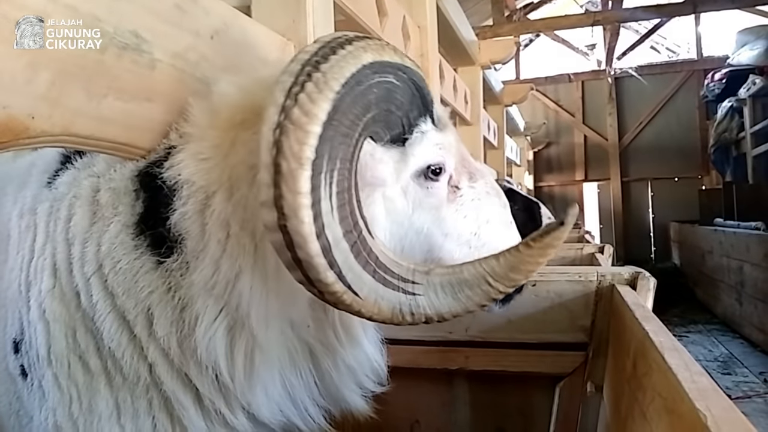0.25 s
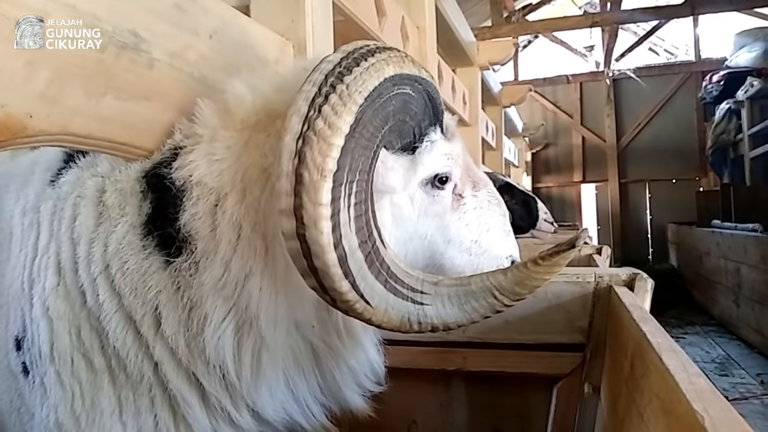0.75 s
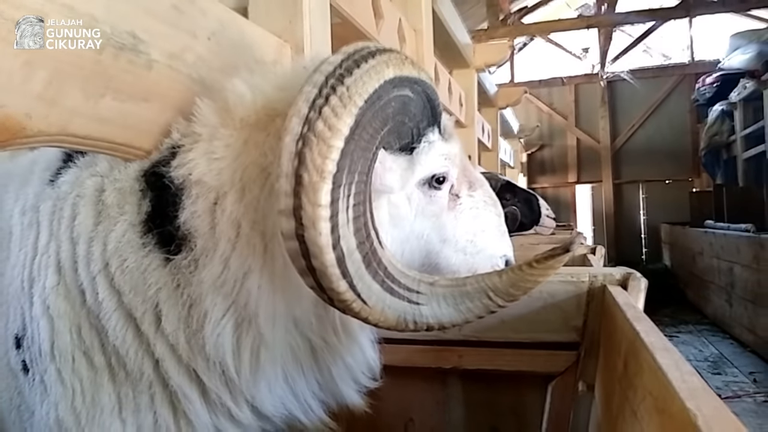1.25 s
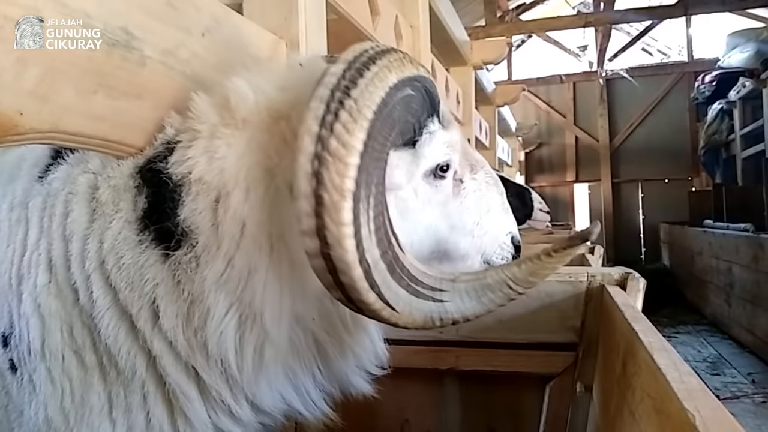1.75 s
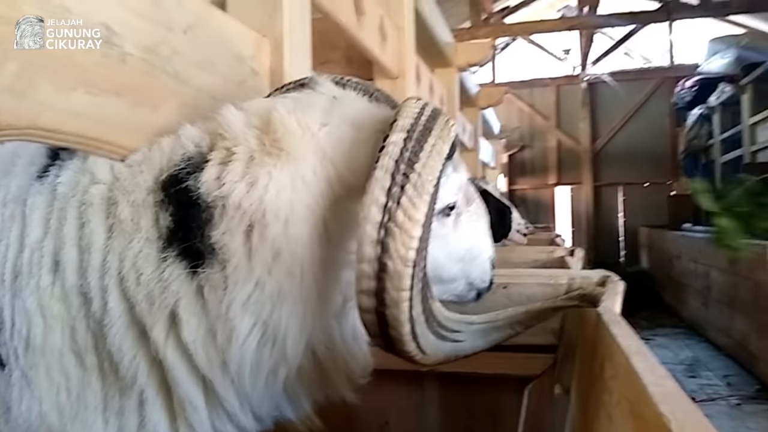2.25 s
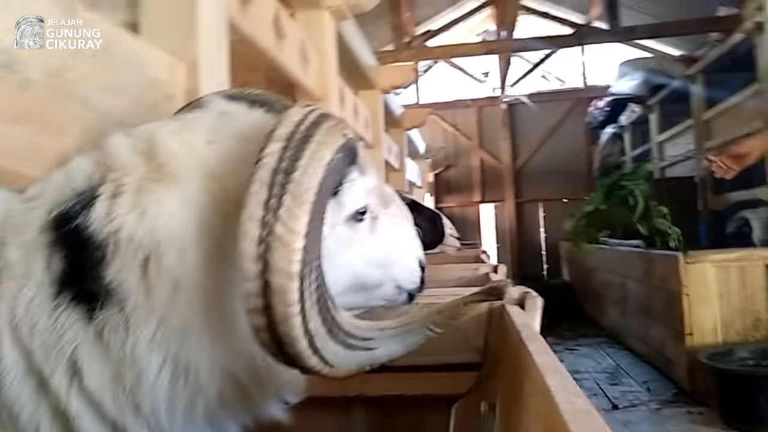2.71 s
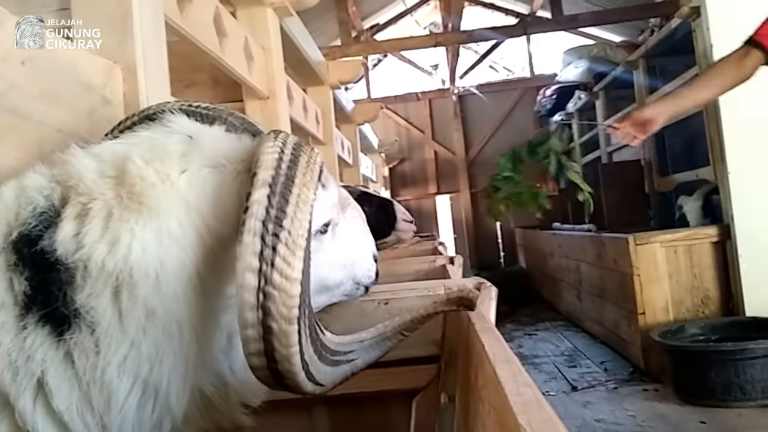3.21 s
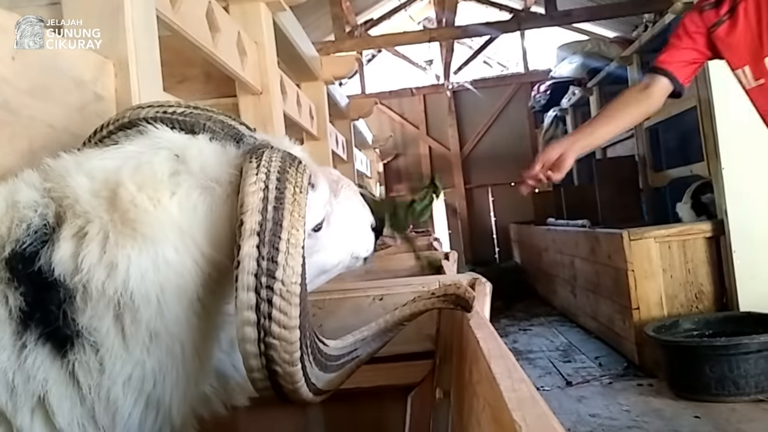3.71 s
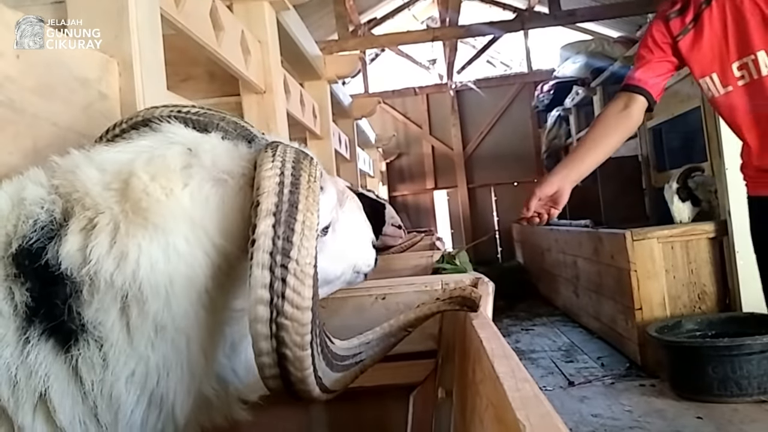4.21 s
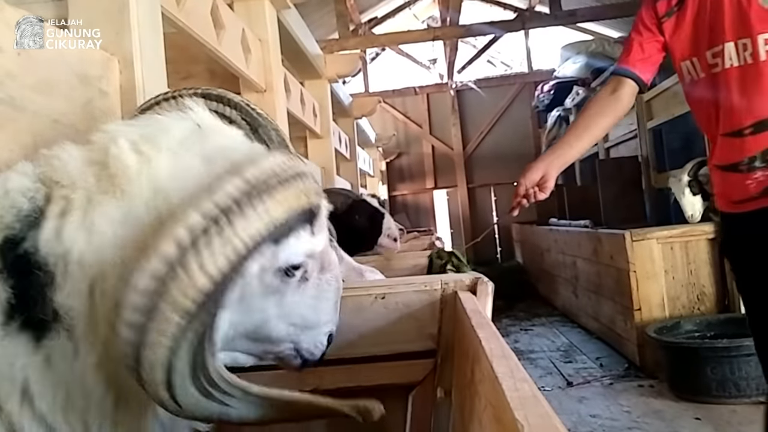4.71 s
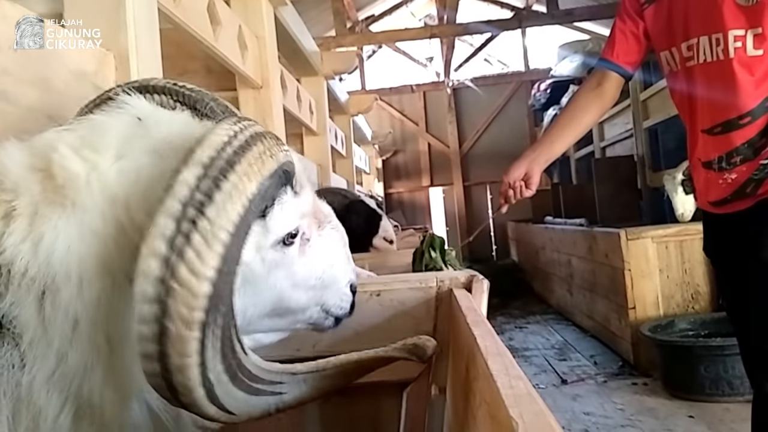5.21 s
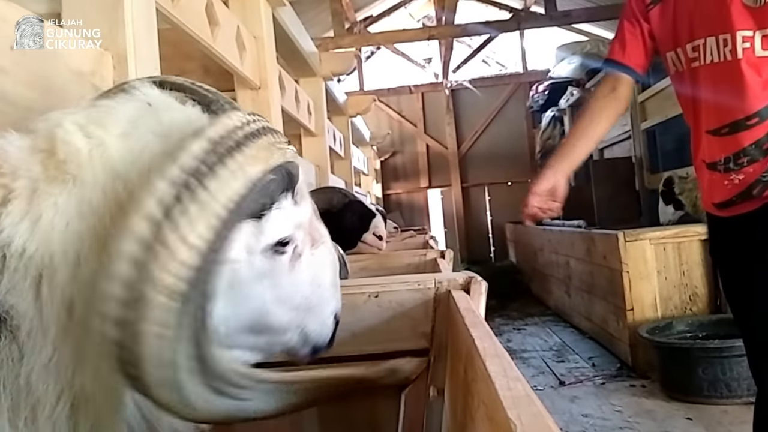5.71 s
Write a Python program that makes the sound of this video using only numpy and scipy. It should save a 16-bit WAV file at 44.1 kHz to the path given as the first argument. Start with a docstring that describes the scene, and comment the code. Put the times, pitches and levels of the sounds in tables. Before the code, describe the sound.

A sheep bleats hoarsely close by in a wooden barn while heavy low thumps, rumble and scuffs of a hand-held microphone dominate, ending near a sharp pop.

```python
"""Inside a wooden barn: shaped-noise air and hiss, thin sine whines up to 2.95 s, and the rumble of a hand-held microphone.
Soft bumps rock the housing as short sinking sines; at 1.3 s a double tick of ringing modes leads into a near sheep.
Its bleat, fold pulses ringing throat resonances, is hoarse at both ends and clear in the middle.
From 2 s fingers scuff the housing in noise bursts with hollow knocks; at 3.4 s a far sheep answers faintly.
One sharp pop, a shaped click, hits the microphone at 5.7 s."""
import sys
import numpy as np
from scipy import signal
from scipy.fft import rfft, irfft
from scipy.io import wavfile
from scipy.ndimage import uniform_filter1d

SR = 44100
rng = np.random.default_rng(int(sys.argv[2]) if len(sys.argv) > 2 else 0)


def inscribe(sig):
    """Save sig as 16-bit PCM at rate SR to the path in sys.argv[1].

    A 1-D sig is mono; a 2-D sig holds one channel per row.
    Samples are clipped to [-1, 1] before scaling.
    """
    pcm = np.round(np.clip(np.atleast_2d(sig).T, -1, 1) * 32767)
    wavfile.write(sys.argv[1], SR, pcm.astype(np.int16))


N = 262395
TIME = np.arange(N) / SR

# soft bumps on the housing: t/s of the swell's peak, peak level/dB, f/Hz that the pitch sinks to
THUMPS = [(0.557, -17.5, 59.6), (.61, -22, 63.4), (.67, -23.5, 56), (2.078, -9.5, 59.4),
          (2.135, -9.5, 56.3), (2.188, -18, 62.2), (2.857, -14.5, 60), (2.9, -16.5, 48.4),
          (3.156, -17, 58.6), (3.229, -1, 77.5), (3.312, -13, 75.5), (3.535, -18.5, 54.8),
          (3.586, -7, 55.2), (3.631, -0.5, 78.2), (3.678, -10, 72), (3.892, -17, 56.5),
          (4.289, -16.5, 51.55), (4.355, -19, 61.9), (4.45, -13, 104), (4.48, -8.5, 72.7),
          (4.503, -13.5, 65.7), (4.526, -8.5, 75), (4.592, -20.5, 58.7), (4.83, -20, 63),
          (5.109, -12.5, 71.5), (5.155, -4, 76.3), (5.211, -3, 75), (5.256, -11, 80), (5.293, -15, 68.6),
          (5.328, -12.5, 60.3), (5.454, -9, 55.7), (5.512, -18, 65), (5.93, -17, 57.7)]
# scuffs of the grip: t/s of the peak, level/dB, rise/s, decay/s, brightness/(dB per octave, 230-1300 Hz)
SCUFFS = [(2.058, -40.5, .022, 0.032, -3), (2.298, -38, 0.0044, 0.01, -2.5), (2.46, -43, 0.005, 0.011, -2),
          (2.843, -48.5, .012, .015, -2), (3.03, -50, 0.0068, .014, -13.5), (3.11, -44, 0.016, .02, -14),
          (3.2, -47, .008, .006, -4), (3.222, -25.5, .004, 0.0075, -8), (3.304, -41, .003, 0.0082, -7),
          (3.547, -36.5, .004, 0.059, -1), (3.608, -38.5, 0.011, .012, -1.5),
          (3.626, -31, 0.0049, 0.015, -2.5), (3.673, -33, 0.0051, 0.0091, -4.5),
          (4.345, -44.5, 0.02, .06, -20), (4.429, -32.5, .022, 0.034, -.5), (4.438, -26, .006, 0.017, -16),
          (4.834, -41.5, 0.0041, 0.0085, -8), (5.138, -21.5, .019, 0.02, -4.5),
          (5.18, -27, 0.0078, 0.026, -6), (5.248, -43.5, 0.017, 0.046, 5.5), (5.394, -50, 0.034, 0.01, 8),
          (5.417, -35, 0.025, 0.042, -5.5), (5.85, -47, 0.045, 0.044, 2.5)]


def amp(db):
    """Decibels to gain."""
    return 10 ** (np.asarray(db) / 20)


def unit(x):
    """Scales to rms 1."""
    return x / np.sqrt(np.mean(x ** 2) + 1e-20)


def read(points, hz):
    """Reads a spectrum table on a log-frequency axis."""
    f, value = np.transpose(points)
    return np.interp(np.log(hz + 1), np.log(f + 1), value)


def follow(rows, t):
    """Reads every column of a curve table at the times t."""
    s, *columns = np.transpose(rows)
    return [np.interp(t, s, c) for c in columns]


def add(mix, s, sound):
    """Mixes a sound in at time s."""
    part = mix[max(round(s * SR), 0):][:len(sound)]
    part += sound[:len(part)]


def noise(colour):
    """Noise of rms 1 with the given spectrum."""
    spectrum = rfft(rng.standard_normal(N))
    return unit(irfft(spectrum * amp(read(colour, np.fft.rfftfreq(N, 1 / SR))), N))


def wander(rate_hz, t=TIME):
    """A random drift of rms 1 over the times t, with two straight segments per cycle of the rate."""
    knots = rng.standard_normal(4096)
    return unit(np.interp((t - t[0]) * 2 * rate_hz, np.arange(len(knots)), knots))


def resonate(x, hz, width):
    """A steep resonance that follows the curve hz: shift down to zero, smooth twice, shift back."""
    turn = np.exp(2j * np.pi * np.cumsum(hz * np.ones(len(x))) / SR)
    r = np.exp(-np.pi * width / SR)
    smooth = signal.lfilter([(1 - r) ** 2], [1, -2 * r, r * r], x / turn + 1e-18)
    return 2 * (turn * smooth).real


def background():
    """Quiet barn air and hiss with faint drones: shaped noise and noise-fed resonances; sine whines switch off."""
    # air spectrum: f/Hz, relative level/dB per Hz
    air_colour = [(150, -21.5), (250, -4.5), (375, -4), (437, -4.5), (655, -9), (1020, -9), (1550, -14.5),
                  (1690, -17.5), (2030, -13.5), (2250, -17), (3050, -16.5), (4730, -20), (14200, -25.5)]
    # faint droning resonances in the air: f/Hz, width/Hz, rms level/dB
    drones = [(1040, 230, -75), (1540, 85, -71.5)]
    # electrical whine: f/Hz, rms level/dB
    whines = [(1000, -70), (2000, -72), (3000, -76), (4000, -82), (13000, -77.5), (14000, -79.5)]
    whine_ends_s, fade_s = 2.95, 0.026
    whine = sum(amp(db) * np.sqrt(2) * np.sin(2 * np.pi * hz * TIME) for hz, db in whines)
    air = amp(-58.5 + 0.63 * wander(7.2)) * noise(air_colour)
    drone = sum(amp(db) * unit(resonate(rng.standard_normal(N), hz, width)) for hz, width, db in drones)
    return air + drone + whine * np.clip((whine_ends_s - TIME) / fade_s, 0, 1)


def rumble(rub_db=-19, rub_growth=1.237, onset_s=0.038):
    """The moving hand shakes the housing without pause, more around each bump, and rubs it more as unrest grows."""
    # slow unrest of the hand: t/s, level/dB before the hand gain
    hand = [(0.0, -44), (0.48, -42.5), (0.6, -41), (0.72, -38), (0.82, -41), (1.09, -44.5), (1.52, -37),
            (1.87, -45.5), (2.29, -37), (2.55, -37), (3.08, -27), (3.33, -32.5), (3.69, -31), (4.06, -32),
            (4.25, -36.5), (4.51, -24.5), (4.92, -41.5), (5.09, -32.5), (5.32, -27), (5.45, -32.5),
            (5.95, -29)]
    # spectrum of the shaking: f/Hz, relative level/dB per Hz
    shake_colour = [(12, -34.5), (20, -18), (42, 1), (65, 1), (116, -11.5), (184, -30.5), (300, -42),
                    (400, -52), (520, -75.5), (880, -120)]
    # skin on the housing: f/Hz, relative level/dB per Hz
    rub_colour = [(60, -43.5), (130, 2), (175, -1.5), (240, -10.5), (400, -24.5), (900, -62.5)]
    hand_gain_db, bass_cut_hz = 4.5, 35.4
    # shake around a 0 dB bump, how far it follows the bump's dB, its decay
    aftershake_db, aftershake_share, aftershake_s = -24, 0.27, 0.076
    power = amp(follow(hand, TIME)[0] + hand_gain_db) ** 2
    for s, db, _ in THUMPS:
        dying = np.exp(-np.maximum((s - TIME) / onset_s, (TIME - s) / aftershake_s).clip(max=20))
        power = power + (amp(aftershake_db + aftershake_share * db) * dying) ** 2
    unrest_db = 10 * np.log10(power)
    shake = noise(shake_colour)
    # level the shake's own swings so that the unrest alone sets its loudness
    shake = shake / np.sqrt(uniform_filter1d(uniform_filter1d(shake ** 2, size=3000), size=3000))
    rub = amp(rub_db + rub_growth * unrest_db + 2 * wander(25)) * noise(rub_colour)
    # the microphone passes little of the deepest rumble
    bass_cut = signal.butter(6, bass_cut_hz, "high", fs=SR, output="sos")
    return signal.sosfilt(bass_cut, amp(unrest_db) * shake + rub)


def thumps(glide=0.93, settle=0.0052, swell=2.3):
    """Each bump swells, more slowly when soft, and rocks a few times, sinking in pitch."""
    # a 0 dB bump peaks within this many cycles; softer ones take longer
    swell_cycles, soft_slowing = 0.788, 0.3533
    t, out = np.arange(SR // 4) / SR, np.zeros(N)
    for s, db, hz in THUMPS:
        rise = swell_cycles / hz * amp(-soft_slowing * db)
        turns = hz * (t + glide * settle * (1 - np.exp(-t / settle)))
        push = (t / rise * np.exp(1 - t / rise)) ** swell
        add(out, s - rise, amp(db) * push * np.sin(2 * np.pi * turns))
    return out


def barn(x):
    """Sparse reflections from boards and roof, the treble dying first."""
    # reverberation of the barn: f/Hz, t60/s
    decay_times = [(200, 0.6), (850, 0.28), (2000, 0.24), (10000, 0.15)]
    struck = rng.random(SR) < 2500 / SR  # about 2500 reflections a second
    taps = rng.standard_normal(SR) * struck * (np.arange(SR) > .006 * SR)
    hz, t, z = signal.stft(taps, SR, nperseg=256)
    fading = amp(-60 * t / read(decay_times, hz)[:, None])
    tail = signal.istft(z * fading, SR, nperseg=256)[1]
    return signal.fftconvolve(x, tail / np.linalg.norm(tail))[:N]


def ticks():
    """Something small and hard taps twice in the pen, its modes ringing briefly."""
    # taps: t/s of the onset, direct peak level/dB
    taps = [(1.323, -43), (1.333, -30.5)]
    # ringing modes: f/Hz, relative level/dB, t60/s
    modes = [(2190, -5, 0.012), (2920, -1.5, 0.012), (3570, 2.5, 0.012), (4350, -14, 0.015),
             (6300, -17, 0.012)]
    t, out = np.arange(SR // 8) / SR, np.zeros(N)
    ring = sum(amp(db - 60 * t / t60) * np.sin(2 * np.pi * hz * t) for hz, db, t60 in modes)
    ring = ring * (1 - np.exp(-t / 0.00037))
    for s, db in taps:
        add(out, s, amp(db) * ring / abs(ring).max())
    return out + amp(-28) * barn(out)


def gesture(pitch, *curves):
    """The controls of one call over time: pitch, level, roughness, mouth opening and brightness."""
    t = np.arange(pitch[0][0], pitch[-1][0], 1 / SR)
    return t, *(follow(curve, t)[0] for curve in (pitch, *curves))


def bleat(controls, throat, jitter, quaver, rasp, doubling, flutter_db, wobble, low_hz, nose_db):
    """Pulses of the vocal folds, uneven, alternately strong and weak, and noisy when hoarse, ring the throat."""
    (t, hz, level_db, rough, mouth, bright_db), out = controls, np.zeros(N)
    unsteady = jitter * wander(70, t) + quaver * wander(9.04, t)
    turns = np.cumsum(hz * (1 + rough * unsteady)) / SR
    folds = unit(sum(np.cos(2 * np.pi * k * turns) for k in np.arange(1, 31)))
    folds = folds * (1 + doubling * rough * np.cos(np.pi * turns))
    # air escapes in a puff at each opening of the folds
    puffs = unit(np.exp(-(turns % 1) / 0.89) * rng.standard_normal(N)[:len(t)])
    drive = (1 - rough) * folds + rasp * rough * puffs
    voice = 0
    for k, (f, width, db) in enumerate(throat):
        # the mouth moves the three lowest resonances; a hoarse throat makes each one tremble on its own
        centre = f * (mouth if k < 3 else 1) * (1 + wobble * rough * wander(25, t))
        tilt_db = bright_db * np.log2(min(f, 2300) / 800)
        gain = amp(db + tilt_db + flutter_db * rough * wander(30.1, t))
        voice = voice + gain * resonate(drive, centre, width)
    # the mouth radiates little below its first resonance; a weak husk comes through the nose
    voice = signal.sosfilt(signal.butter(6, low_hz, "high", fs=SR, output="sos"), voice)
    voice = voice + amp(nose_db) * resonate(drive + puffs, 483, 530)
    # level the voice so that the effort curve alone sets its loudness
    voice = voice / np.sqrt(abs(uniform_filter1d(voice ** 2, size=1400)) + 1e-9)
    effort = amp(level_db + flutter_db * rough * wander(44.1, t))
    add(out, t[0], voice * effort * signal.windows.tukey(len(t), .03))
    return out


def chest(controls, jitter=0.01):
    """The lowest harmonics hum through chest and nose, clean even where the throat is hoarse, and grow with time."""
    # first four harmonics of the hum: rms level/dB at mid-call, before the mix
    harmonics_db = [-54.5, -61.5, -62.5, -59.5]
    growth_db_per_s, fade_s = 7.5, 0.059
    (t, hz, *_), out = controls, np.zeros(N)
    turns = np.cumsum(hz * (1 + jitter * wander(30.4, t))) / SR
    hum = sum(amp(db) * np.sqrt(2) * np.sin(2 * np.pi * (k + 1) * turns) for k, db in enumerate(harmonics_db))
    held = np.clip(np.minimum(t - t[0], t[-1] - t) / fade_s, 0, 1)
    add(out, t[0], hum * held * amp(growth_db_per_s * (t - t.mean())))
    return out


def mouth_rasp(controls):
    """Air hisses out of the open mouth in time with the folds, more when the voice is hoarse."""
    # air over tongue and teeth: f/Hz, relative level/dB per Hz
    rasp_colour = [(1200, -34), (2500, -14), (2950, 0), (3300, -1), (3700, -4), (4400, -13), (7000, -19),
                   (12000, -36)]
    rasp_db, rasp_share = -41, 0.49  # level at 0 dB effort, and how far it follows the effort's dB
    (t, hz, level_db, rough, *_), out = controls, np.zeros(N)
    phase = np.cumsum(hz) / SR % 1
    puffs = unit(np.exp(-2 * phase) * noise(rasp_colour)[:len(t)])
    loudness = np.sqrt(rough) * amp(rasp_db + rasp_share * level_db)
    add(out, t[0], puffs * loudness * signal.windows.tukey(len(t), .1))
    return out


def sheep(nose_db=-25.5, far_nose_db=-25):
    """The near animal's fold-driven call and the far one's answer, heard more through the barn than direct."""
    # throat resonances of each animal: f/Hz, width/Hz, relative level/dB
    near_throat, far_throat = [(801.4, 147, -4.5), (885.5, 137, -9.5), (1040, 80, -14), (1380, 130, -24),
                               (1656, 162, -15.5), (2320, 185, -22.5), (2930, 420, -34.5),
                               (3730, 1100, -49.5)], [(517, 200, 3), (775, 160, 2.5), (1060, 300, 3),
                                               (1360, 250, -12)]
    # pitch of each bleat: t/s, f/Hz
    near_pitch, far_pitch = [(1.325, 148.8), (1.372, 150.6), (1.396, 158.9), (1.456, 157.4), (1.478, 166.6),
                             (1.536, 164.7), (1.562, 158.9), (1.774, 152.7), (1.864, 146.6), (1.885, 143.5),
                             (1.94, 142.4), (1.97, 137.8), (2.03, 134.5)], [(3.41, 268), (3.45, 260), (3.51, 242.7), (3.56, 266.5),
                                                 (3.73, 267.1), (3.82, 262.1), (3.9, 256.4), (3.97, 256.1),
                                                 (4.13, 263.3), (4.4, 249.6)]
    # effort of each bleat, the near one in uneven pushes: t/s, level/dB before the mix
    near_level, far_level = [(1.325, -53), (1.342, -42), (1.362, -46.5), (1.402, -32.5), (1.435, -39),
                             (1.462, -38), (1.485, -34.5), (1.54, -37), (1.606, -35), (1.645, -34),
                             (1.775, -32.5), (1.815, -36.5), (1.864, -38), (1.915, -39.5), (1.948, -44),
                             (1.97, -38.5), (2.0, -49.5), (2.03, -55)], [(3.409, -58), (3.452, -51.5), (3.51, -66), (3.56, -57),
                                                 (3.68, -58), (3.79, -51.5), (3.9, -53), (3.97, -57.5),
                                                 (4.15, -60), (4.27, -59.5), (4.4, -63)]
    # hoarseness: t/s, roughness/(0-1)
    near_rough, far_rough = [(1.33, .7), (1.37, .5), (1.4, .27), (1.445, .55), (1.485, .22), (1.53, .33),
                             (1.572, .06), (1.81, .05), (1.84, .1), (1.875, .35), (1.92, .16), (1.97, .55),
                             (2.03, .9)], [(3.41, .18), (3.52, .3), (3.62, .22), (3.76, .12),
                                                 (3.84, .17), (3.91, .2), (4, .7), (4.4, .8)]
    # mouth opening: t/s, factor on the three lowest throat resonances
    near_mouth, far_mouth = [(1.33, 0.92), (1.46, 0.98), (1.57, 0.98), (1.61, 1.09), (1.66, 1.01),
                             (1.78, 1.007), (1.83, 1.057), (1.92, 1.035), (2.0, 0.99)], [(3.41, 1.01), (3.88, 0.89), (4.4, 0.94)]
    # brightness: t/s, tilt/(dB per octave on the throat resonances)
    near_bright, far_bright = [(1.35, 1.5), (1.41, -3.5), (1.5, 0), (1.62, 2), (1.7, -1.5), (1.785, -4.5),
                               (1.825, 4), (1.9, .5), (1.97, 0), (2.03, -6)], [(3.41, 7.5), (3.5, -2), (3.68, 6), (3.79, -9),
                                                    (3.9, -0.5), (4.4, 2)]
    call = gesture(near_pitch, near_level, near_rough, near_mouth, near_bright)
    answer = gesture(far_pitch, far_level, far_rough, far_mouth, far_bright)
    near = bleat(call, near_throat, jitter=.065, quaver=.02, rasp=1.0, doubling=1.2,
                 flutter_db=3, wobble=.05, low_hz=660, nose_db=nose_db)
    near = near + chest(call) + mouth_rasp(call)
    far = bleat(answer, far_throat, jitter=.06, quaver=.05, rasp=2.8, doubling=.8,
                flutter_db=4, wobble=.06, low_hz=440, nose_db=far_nose_db)
    far = far + amp(-4) * chest(answer, jitter=0.04015)
    direct = amp(-2.5) * near + amp(-8.5) * far
    return direct + barn(amp(-7.5) * near + amp(-6.5) * far)


def scuffs(size=16384):
    """Fingers slip on the housing: noise bursts that swell and die away, some dull and some bright."""
    # spectrum of a slip before its brightness: f/Hz, relative level/dB per Hz
    slip_colour = [(60, -27.5), (140, -10), (230, 3), (330, -5), (560, -13), (800, -22), (1250, -28.5),
                   (1900, -54), (5000, -73)]
    t, hz, out = np.arange(size) / SR, np.fft.rfftfreq(size, 1 / SR), np.zeros(N)
    grain = amp(1.2 * wander(50))
    for s, db, rise, decay, tilt_db in SCUFFS:
        colour = amp(read(slip_colour, hz) + tilt_db * np.log2(np.clip(hz, 230, 1300)))
        slip = irfft(rfft(rng.standard_normal(size)) * colour)
        slip = slip / np.sqrt(uniform_filter1d(uniform_filter1d(slip ** 2, size=600), size=600))
        swelling = np.sin(np.pi / 2 * np.minimum(t / rise, 1)) ** 2
        pressure = swelling * np.exp(-np.maximum(t - rise, 0) / decay)
        add(out, s - rise, amp(db) * pressure * slip)
    return out * grain


def knocks(attack=0.0016, lead_s=0.00083):
    """In each scuff the finger lands: the housing gives a hollow ring, strongest when the touch is hard and sudden."""
    ring_hz, t60_s = 205, 0.032
    pitch_spread = .14  # largest random shift of the pitch with the grip, as a share
    # gain of the ring, its dB per dB of scuff, and the slowness of touch that damps it
    gain_db, growth, damping_rise_s = 21.5, 1.127, 0.066
    t, out = np.arange(SR // 6) / SR, np.zeros(N)
    dying = amp(-60 * t / t60_s) * (1 - np.exp(-t / attack)) ** 2
    for (s, db, rise, _, _), grip in zip(SCUFFS, rng.uniform(-1, 1, len(SCUFFS))):
        ring = dying * np.sin(2 * np.pi * ring_hz * (1 + pitch_spread * grip) * t)
        add(out, s - lead_s, amp(gain_db + growth * db) * np.exp(-rise / damping_rise_s) * ring)
    return out


def pop(size=4096):
    """One abrupt pressure step on the microphone: a minimum-phase click, its energy packed at the onset."""
    # the sharp pop: t/s of the onset, peak level/dB
    onset_s, peak_db = (5.6932, -0.95)
    # its spectrum: f/Hz, relative level/dB
    pop_colour = [(30, -25), (90, 7), (200, 6.5), (400, 0.5), (1000, -8.5), (2600, -17.5), (5000, -25),
                  (10000, -34), (14000, -44)]
    log_gain = np.log(amp(read(pop_colour, abs(np.fft.fftfreq(size, 1 / SR)))))
    # the phase follows from the log gain
    click = np.fft.ifft(np.exp(np.conj(signal.hilbert(log_gain)))).real[:size // 2]
    out = np.zeros(N)
    add(out, onset_s, -amp(peak_db) * click / abs(click).max())
    return out


def scene():
    """The barn and the handling noise at one microphone."""
    barn_sounds = background() + ticks() + sheep()
    handling = rumble() + thumps() + scuffs() + knocks() + pop()
    return (barn_sounds + handling)[None]


def record(dry):
    """The recorder's band limit: a steep low-pass."""
    edge_hz = 14300
    band_limit = signal.firwin(511, edge_hz, window=("kaiser", 9), fs=SR)
    return signal.oaconvolve(dry, band_limit[None], "same")


dry = scene()
out = record(dry)
inscribe(out)
```